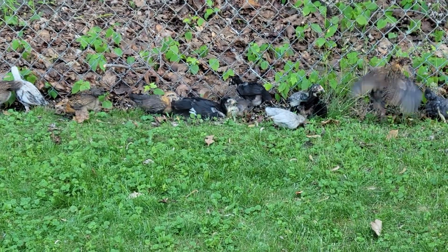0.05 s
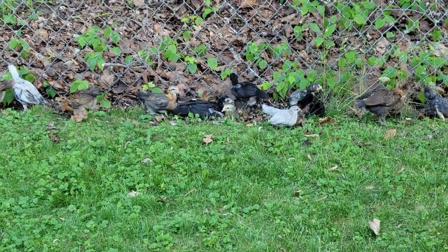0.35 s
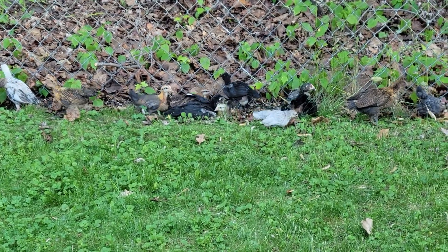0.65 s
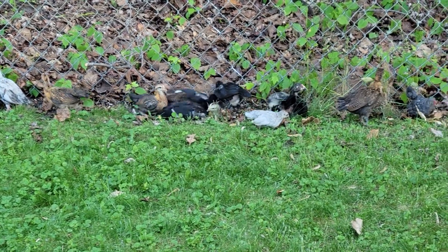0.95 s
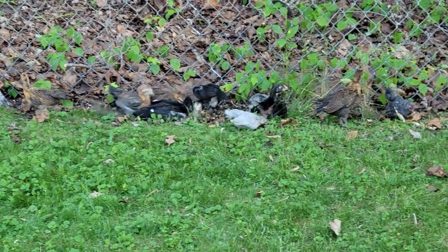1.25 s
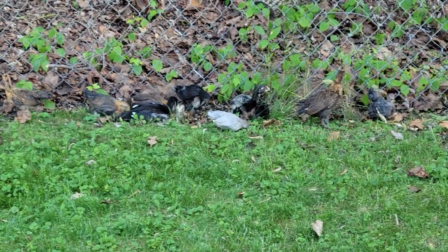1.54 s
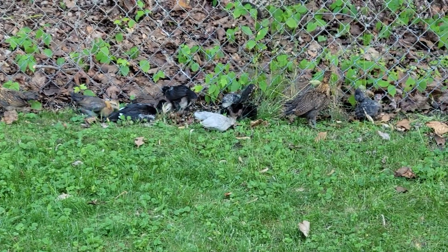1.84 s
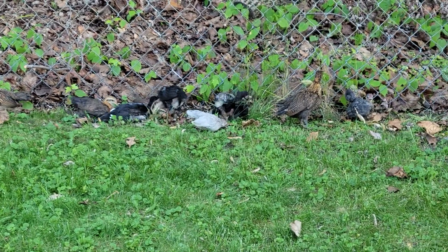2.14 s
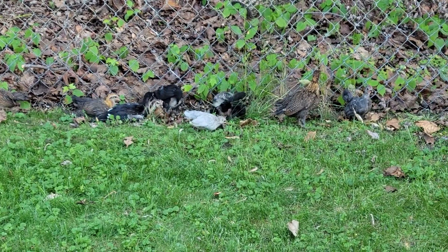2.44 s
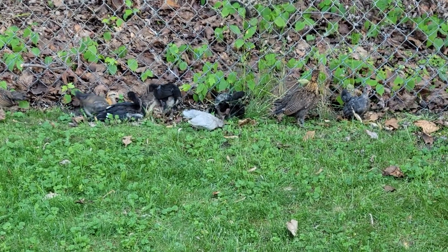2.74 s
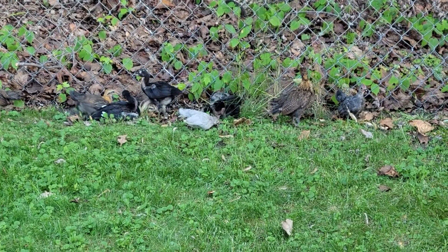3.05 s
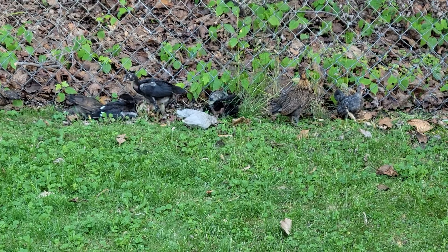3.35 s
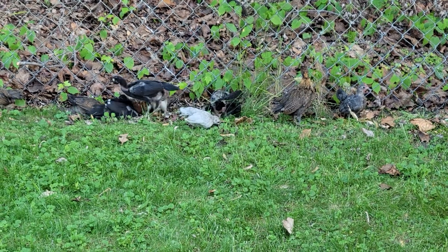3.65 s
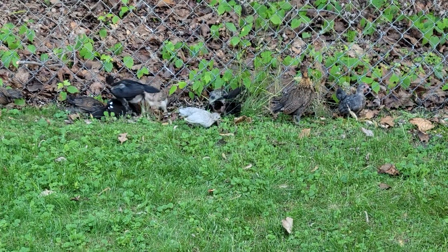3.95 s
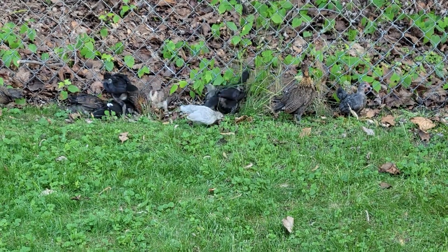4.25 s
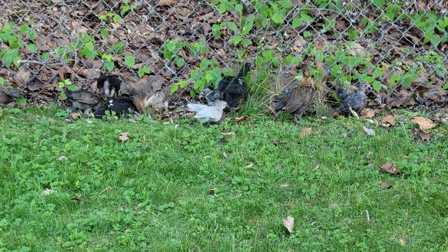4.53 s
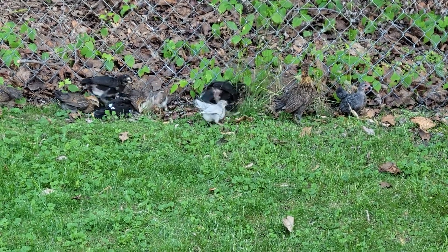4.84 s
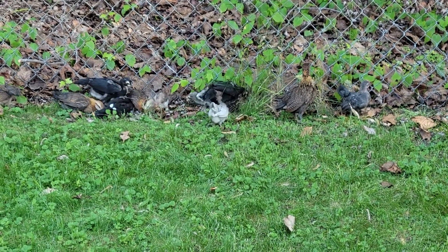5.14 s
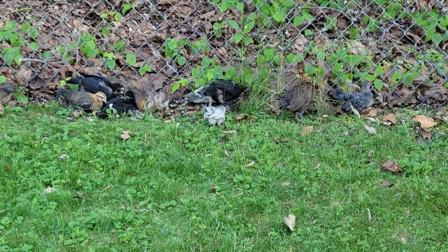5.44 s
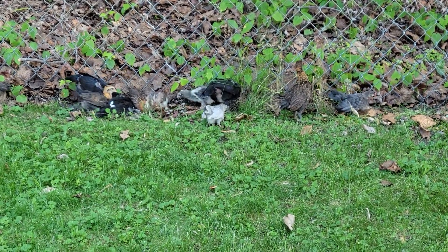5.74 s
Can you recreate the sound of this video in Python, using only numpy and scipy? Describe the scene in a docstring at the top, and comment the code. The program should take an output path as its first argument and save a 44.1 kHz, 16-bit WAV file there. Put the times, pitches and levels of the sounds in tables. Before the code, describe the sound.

In a garden, young chickens peep in quick, quiet notes, some hoarse, and scratch barely audibly in dry leaves. The low, wavering hum of a distant lawn mower is the strongest sound and runs the whole time with a light hiss. Some brief dull bumps land a little after two seconds. Far off, one bird sings a dry trill that stops past halfway, and another adds thin whistles. The birds sit to the microphone's right.

```python
"""Young chickens peep and scratch in dry leaves along a garden fence, each call a quick syrinx glide,
a few breaking into a rasp. Under them a lawn mower drones a few gardens away: low engine orders swell
and fade as it moves, with exhaust rumble, a ringing deck and the rush of the blades on top.
One songbird trills far off, another whistles, and a soft hiss fills the background.
A few dull scuffs land about two seconds in."""
import sys
import numpy as np
from scipy import signal
from scipy.fft import rfft, irfft, next_fast_len
from scipy.io import wavfile
from scipy.ndimage import uniform_filter1d, map_coordinates

SR = 44100
rng = np.random.default_rng(int(sys.argv[2]) if len(sys.argv) > 2 else 0)


def pcm_store(signal):
    """Save signal as 16-bit PCM."""
    levels = np.round(np.clip(np.atleast_2d(signal), -1, 1) * 32767)
    wavfile.write(sys.argv[1], SR, levels.astype(np.int16).T)


N = 264159

# A pan_db is left minus right; a fader_db is a level ahead of its layer's further gains.
# peeps that dip and flick up: start_s, length_s, low_hz, slide_share, flick_share, level_db
PEEPS = [(.305, 0.06, 1950, .4, .28, -51), (.432, 0.04, 2020, 0.134, 0.47, -46),
         (0.497, 0.037, 2417, 0.18, .32, -44.5), (.935, 0.046, 2410, 0.16, .15, -43),
         (1.0, .02, 2425, .04, 0.015, -47.5), (1.71, 0.063, 2020, 0.087, 0.58, -49.5),
         (1.886, 0.049, 2210, 0.21, 0.33, -43), (2.365, 0.06, 2300, .08, 0.16, -46.5),
         (2.53, 0.042, 2350, .04, .12, -51), (2.593, 0.032, 2530, 0.057, 0, -43.5),
         (3.041, 0.043, 2080, 0.34, 0.32, -43), (3.228, 0.043, 2547, .11, .0, -42.5),
         (4.235, 0.045, 2530, .03, 0.41, -54), (4.51, 0.027, 2350, .19, 0.25, -53),
         (4.838, 0.041, 2580, 0.17, 0.012, -54), (4.9, 0.032, 2130, .03, 0.37, -49.5),
         (5.072, .041, 2306, 0.047, 0.36, -44.5), (5.482, 0.033, 2140, 0.14, 0.22, -46)]
# cheeps that fall ever faster: start_s, length_s, top_hz, fall_share, level_db, pan_db
CHEEPS = [(0.294, .055, 3370, 0.16, -57, -9), (1.129, 0.061, 3135, 0.18, -50.5, -10),
          (1.636, 0.04, 3410, 0.38, -52, -15), (1.837, .047, 3750, 0.55, -52, -9),
          (1.978, 0.057, 3680, 0.45, -51, -9), (2.397, 0.032, 2950, 0.2, -49, -15),
          (2.515, 0.048, 3480, 0.28, -52.5, -9), (2.58, 0.072, 3830, .07, -53.5, -25),
          (2.909, 0.07, 3850, 0.22, -51, -20), (3.116, 0.03, 3650, 0.43, -52, -9),
          (3.21, .055, 3660, .23, -57, -21), (3.412, .056, 3650, .36, -56, -17.5),
          (3.769, 0.068, 3860, 0.45, -49, -16), (3.88, 0.073, 3800, 0.34, -48, -21),
          (4.003, 0.07, 4020, 0.39, -50, -20), (4.148, 0.053, 4020, 0.45, -50.5, -14),
          (4.409, 0.069, 3860, 0.21, -52, -15), (4.666, 0.06, 3500, 0.38, -53.5, -6),
          (4.783, 0.054, 3730, 0.29, -55, -13), (5.683, .051, 2750, 0.25, -53, -12)]
# pips in one small arch: start_s, length_s, top_hz, arch_share, level_db, pan_db
PIPS = [(0, 0.019, 2710, .04, -49, -7), (0.147, 0.023, 1790, .03, -46.5, -3),
        (.886, 0.0286, 2720, 0.23, -46.5, -9), (1.192, 0.028, 2480, 0.13, -40.5, -7),
        (1.221, 0.021, 1920, .04, -49, -12), (4.559, 0.056, 3760, .1, -52, -18),
        (4.877, .03, 1550, 0.026, -48, -11), (4.957, 0.039, 3680, 0.082, -53.5, -15),
        (5.09, 0.028, 3830, .15, -54, -17), (5.402, .028, 3280, 0.043, -45, -14),
        (5.429, 0.033, 4050, .22, -51, -24)]
# the syrinx breaking into a rasp: start_s, length_s, level_db
RASPS = [(0.288, 0.12, -56), (0.43, 0.081, -53), (0.505, 0.027, -45), (0.894, 0.13, -45.5),
         (1.887, 0.13, -49), (2.272, 0.026, -46), (2.388, .05, -49), (5.436, .03, -63)]
# throat resonances of the rasp: frequency_hz, gain_db
THROAT_EQ = [(1200, -28), (1750, 8), (2100, 2), (2550, 7), (3300, 5.5), (4000, -25), (5000, -12),
             (6000, -45), (8000, -60)]
# decay of the garden's echo: frequency_hz, t60_s
GARDEN_DECAY = [(200, 0.23), (3000, 0.33), (10000, 0.27)]

# engine speed, four firings to a cycle: time_s, cycle_hz
ENGINE_SPEED = [(0, 19.65), (.5, 19.51), (1.2, 19.28), (2, 19.12), (3, 18.92), (3.75, 18.74), (4.5, 18.92),
                (5.2, 18.72), (5.99, 18.55)]
# the four strongest harmonics, each fading on its own way over the gardens: time_s, fader_db
HARMONIC_RIDES = [[(0.01, -31.2), (0.27, -35), (0.73, -33.6), (0.85, -39.5), (1.07, -41), (1.19, -33.5),
                   (2.03, -33), (2.23, -29.5), (2.71, -30.5), (3.37, -37.5), (3.73, -26.0), (4.09, -30),
                   (4.87, -29), (5.07, -31.5), (5.29, -45), (5.39, -34.5), (5.59, -33), (5.97, -39.5)], [(0.01, -52), (0.69, -46.7), (0.91, -54), (1.25, -48.1), (1.59, -52),
                                        (2.99, -49.5), (3.31, -57), (4.13, -51.3), (5.15, -64),
                                        (5.97, -42.5)],
                  [(0.01, -41), (0.45, -35), (0.81, -42.1), (0.91, -37.5), (1.65, -40), (1.93, -34),
                   (2.75, -41.5), (3.35, -38.5), (3.43, -36), (4.69, -41.5), (4.83, -49), (5.03, -42.5),
                   (5.71, -37), (5.97, -38)], [(0.01, -56.0), (0.71, -55.5), (1.81, -41), (2.91, -42),
                                           (2.99, -50.5), (3.29, -42.5), (4.11, -41), (4.33, -49.4),
                                           (4.47, -42), (5.09, -45), (5.97, -38.5)]]
# balance of those harmonics, first to fourth: trim_db
HARMONIC_TRIMS = [-0.48, -0.71, 0.13, 0.074]
# a tone just under the firing rate that makes the drone throb: time_s, level_db
THROB_RIDE = [(2.9, -56), (3.6, -50), (4.3, -42), (5.4, -43), (5.99, -65)]
# weak orders from unequal firings: cycle_multiple, fader_db
WEAK_ORDERS = [(11, -56), (13, -51.5), (14, -63), (15, -61.5), (17, -54), (18, -62.5), (20, -66), (24, -68),
               (25, -65), (42, -62), (46, -74), (50, -69)]
# hum of a second, fainter machine: pitch_hz, fader_db
FAR_HUM = [(48.5, -54), (101.5, -52.5)]
# exhaust rumble: frequency_hz, gain_db
EXHAUST_EQ = [(15, -20), (32, -6), (48, -0.5), (95, 5), (125, -6), (180, -6), (245, -3), (335, -4.5),
              (420, -11.5), (515, -14.5), (600, -14.5), (900, -50)]
# the cutting deck's hollow ring: frequency_hz, gain_db
DECK_EQ = [(400, -7), (480, -7.5), (520, 7.5), (550, -5), (600, -6), (700, -53)]
# swells of that ring: time_s, fader_db
DECK_RIDE = [(0.01, -52.5), (0.25, -45.5), (1.17, -61.5), (2.05, -46.5), (2.19, -52.5), (4.09, -54.5),
             (5.15, -57.5), (5.97, -56)]
# air rushing off the blades: frequency_hz, gain_db
BLADE_EQ = [(400, -25), (650, -10.5), (790, -1.5), (1000, -1.5), (1170, 1.5), (1270, -10), (1450, -11.5),
            (2000, -14.5), (3500, -72)]
# swells of that rush: time_s, fader_db
BLADE_RIDE = [(0.01, -48), (0.53, -53.5), (1.05, -49), (1.63, -51.8), (2.15, -47.5), (3.05, -50.5),
              (5.97, -50.5)]
# soft background hiss, cut off steeply above about 7 kHz: frequency_hz, gain_db
HISS_EQ = [(700, -5.5), (1400, -1), (1900, -2.5), (3000, 1), (4200, -5), (5500, -12), (7100, -16),
           (7600, -28.5), (9500, -26), (12500, -27.5), (15500, -30.5)]
# its lean to the right: frequency_hz, pan_db
HISS_PAN = [(60, -0.5), (110, -0.5), (200, -0.5), (380, -2), (700, -1.5), (1290, -4.5), (2380, -3),
            (4400, -10), (8120, -9), (15000, -9.5)]

# pace of the trill: time_s, chips_per_s
TRILL_PACE = [(0, 20.4), (1.4, 19.6)]
# swells of the trill: time_s, fader_db
TRILL_RIDE = [(.03, -58), (.8, -59), (1.3, -54), (2.3, -58.5), (2.8, -56.5), (3.2, -56), (3.7, -63)]
# feet and beaks in the leaves: start_s, length_s, fader_db
SCRATCHES = [(.13, .08, -75), (2.7, .05, -71), (3.55, 0.092, -76), (3.7, .13, -74), (3.797, .015, -66),
             (4.066, .012, -65), (4.55, 0.28, -78), (4.855, 0.019, -67), (4.787, .26, -68),
             (5.018, 0.15, -74), (5.18, .05, -72), (5.8, 0.13, -76)]
# crisp top of dry leaves: frequency_hz, gain_db
LEAF_EQ = [(800, -22), (2500, -11), (10000, 4), (15500, -7)]
# far whistled notes: start_s, length_s, pitch_hz, fader_db
WHISTLES = [(1.16, 0.11, 3075, -47.5), (1.27, 0.1, 3140, -47.5), (2.409, 0.075, 2963, -47),
            (2.638, 0.11, 2765, -41.5), (2.73, 0.095, 2790, -49.5), (3.464, 0.077, 3020, -51),
            (4.068, 0.096, 3054, -48.5), (4.15, .06, 3160, -44), (5.215, 0.056, 3200, -47.5)]
# dull knocks and scuffs: start_s, length_s, level_db
SCUFFS = [(2.209, 0.026, -34.5), (2.257, 0.04, -56), (2.324, 0.07, -42), (2.595, 0.12, -42.5)]
# their boxy midrange: frequency_hz, gain_db
SCUFF_EQ = [(400, -33), (700, -14), (950, 14), (1400, -21), (2700, -13), (4500, -35), (8000, -81)]


def amp(db):
    """Decibels to gain."""
    return 10 ** (np.asarray(db) / 20)


def unit(x):
    """Scaled to rms 1."""
    return x / np.sqrt(np.mean(x ** 2) + 1e-20)


def along(points, hz):
    """A curve over frequency, read on a log axis."""
    knots_hz, values = np.transpose(points)
    return np.interp(np.log(hz + 1), np.log(knots_hz + 1), values)


def ride(points):
    """An automation curve, one value per sample."""
    return np.interp(np.arange(N) / SR, *np.transpose(points))


def wobble(rate):
    """A smooth random curve, rate knots a second."""
    return map_coordinates(rng.standard_normal(int(N * rate / SR) + 4), [np.arange(N) * rate / SR])


def filtered(x, response):
    """x through a complex frequency response."""
    size = next_fast_len(N + SR // 2)
    return irfft(rfft(x, size) * response(np.fft.rfftfreq(size, 1 / SR)), size)[..., :N]


def pan(pan_db):
    """Left and right gains of mean power 1."""
    return unit(amp([[pan_db / 2], [-pan_db / 2]]))


def add(track, start_s, sound):
    """Mix a sound in at start_s."""
    part = track[..., round(start_s * SR):][..., :sound.shape[-1]]
    part += sound[..., :part.shape[-1]]


def bursts(events, taper=1):
    """An envelope with one soft bump per event; taper is the share spent fading."""
    envelope = np.zeros(N)
    for start_s, length_s, db in events:
        add(envelope, start_s, amp(db) * signal.windows.tukey(int(length_s * SR), taper))
    return envelope


def tone(phase, random_start=True):
    """A sine of rms 1."""
    return np.sqrt(2) * np.sin(phase + (rng.uniform(0, 2 * np.pi) if random_start else 0))


def rush(eq, shared, patchy_db):
    """Stereo noise of rms 1, partly common to both sides, with patches of random gain."""
    spectra = signal.stft(rng.standard_normal((3, N)), nperseg=512)[2]
    patches = uniform_filter1d(rng.standard_normal(spectra.shape[1:]), size=5, axis=0)
    patches = unit(uniform_filter1d(patches, size=14, axis=1))
    noise = signal.istft(spectra * amp(patchy_db * patches), nperseg=512)[1][:, :N]
    pair = np.sqrt(shared) * noise[2] + np.sqrt(1 - shared) * noise[:2]
    return unit(filtered(pair, lambda hz: amp(along(eq, hz))))


def syrinx(length_s, glide, rise_db, waver, overtone_db=-35):
    """A bird note of rms 1: its pitch is glide(u), u from 0 to 1, and its level tilts by rise_db."""
    u = np.linspace(0, 1, int(length_s * SR))
    tremor, flutter = (map_coordinates(knots, [u * length_s * 400], mode="mirror")
                       for knots in rng.standard_normal((2, 128)))
    hz = glide(u)
    phase = 2 * np.pi * np.cumsum(hz * (1 + waver * tremor)) / SR
    gate = np.sin(np.pi / 2 * np.minimum(1, np.minimum(u / .2, (1 - u) / .1)))
    swell = gate * amp(rise_db * u + 1.2 * np.sin(np.pi * u) + 1.5 * flutter)
    overtone = amp(overtone_db) / (1 + (hz / 2900) ** 10)  # the throat passes it only on low notes
    return unit(swell * (np.sin(phase) + overtone * np.sin(2 * phase)))


def arching(hz, arch):
    """Pitch that tops out at hz in the middle."""
    return lambda u: hz * (1 - arch * (2 * u - 1) ** 2)


def falling(hz, fall, apex, bend):
    """Pitch that tops out at hz when u is apex, then drops, ever faster if bend is over 1."""
    return lambda u: hz * (1 - fall * (np.abs(u - apex) / (1 - apex)) ** bend)


def dipping(hz, slide, flick, turn=.659):
    """Pitch that slides down to hz until u is turn, then flicks up."""
    return lambda u: hz * (1 + slide * np.maximum(1 - u / turn, 0) ** 1.092
                           + flick * np.maximum((u - turn) / (1 - turn), 0) ** 1.86)


def scattered(x, spread_s):
    """Leaves and ground smear a sound over a few ms, differently on each side."""
    t = np.arange(SR // 25) / SR
    paths = rng.standard_normal((2, len(t))) * np.exp(-t / spread_s)
    return signal.fftconvolve(x[None], paths / np.linalg.norm(paths[0]), axes=1)[:, :N]


def garden(x):
    """Diffuse echo from fence, trees and house walls."""
    hz, t, spectra = signal.stft(rng.standard_normal((2, SR // 2)), SR, nperseg=256)
    decay = amp(-60 * t / along(GARDEN_DECAY, hz)[:, None])
    onset = 1 - np.exp(-t / .0049)
    tail = signal.istft(spectra * decay * onset, SR, nperseg=256)[1]
    return signal.fftconvolve(np.atleast_2d(x), tail / np.linalg.norm(tail[0]), axes=1)[:, :N]


def chick_calls(peep_pan_db=-10, faint_per_s=3):
    """The flock's cue list: start_s, length_s, glide, level_db, pan_db."""
    calls = []
    for start_s, length_s, hz, slide, flick, db in PEEPS:
        calls.append((start_s, length_s, dipping(hz, slide, flick), db, peep_pan_db))
    for start_s, length_s, hz, fall, db, pan_db in CHEEPS:
        calls.append((start_s, length_s, falling(hz, fall, apex=.168, bend=1.9), db, pan_db))
    for start_s, length_s, hz, arch, db, pan_db in PIPS:
        calls.append((start_s, length_s, arching(hz, arch), db, pan_db))
    # faint peeps from the rest of the flock
    for when, pitch, slide, flick in rng.random((int(faint_per_s * N / SR), 4)):
        glide = dipping(2560 * (1 + .3 * (pitch - .5)), .193 * slide, .5 * flick)
        calls.append((when * N / SR, .045, glide, -58.5, peep_pan_db))
    return calls


def chicks():
    """Calls along the fence; a strained syrinx rasps and sounds more of its octave."""
    hoarseness = bursts(RASPS, taper=.8)
    flock = hoarseness * rush(THROAT_EQ, shared=.8, patchy_db=2) * pan(-10)
    for start_s, length_s, glide, db, pan_db in chick_calls():
        middle = min(int((start_s + length_s / 2) * SR), N - 1)
        strain = min(hoarseness[middle] / amp(db), .5)
        overtone_db = 20 * np.log10(.036 + .25 * strain)
        call = syrinx(length_s, glide, rise_db=5, waver=.018, overtone_db=overtone_db)
        add(flock, start_s, amp(db) * call * pan(pan_db))
    send = flock.mean(0)
    echo = amp(-6.5) * scattered(send, spread_s=.0066) + amp(-11.5) * garden(send)
    return flock + echo * pan(.5)


def mower_engine(cycle, throb_hz=5.05, throb_crest_s=4.66):
    """Engine orders flutter in the moving air while a nearby tone beats against the lowest."""
    firing = 4 * cycle
    beat = 2 * np.pi * throb_hz * (np.arange(N) / SR - throb_crest_s)
    drone = amp(ride(THROB_RIDE)) * tone(firing - beat, random_start=False)
    rides_db = [ride(points) for points in HARMONIC_RIDES]
    for k, (db, trim_db) in enumerate(zip(rides_db, HARMONIC_TRIMS), 1):
        drone += amp(db + trim_db + .5 * wobble(9)) * tone(k * firing, random_start=k > 1)
    for order, db in WEAK_ORDERS:
        # the lower ones fade with the nearest strong harmonic
        nearest_db = rides_db[min(round(order / 4), 4) - 1]
        fade_db = .89 * (nearest_db - nearest_db.mean()) if order < 22 else 0
        drone += amp(db + fade_db + 1.5 * wobble(2.54)) * tone(order * cycle)
    return drone * pan(-.4)


def far_machine():
    """A second machine hums underneath, drifting in level and pitch."""
    hum = np.zeros(N)
    for hz, db in FAR_HUM:
        gain = amp(db + 1 + 2.7 * wobble(3.5))
        drifting_hz = hz * (1 + .0202 * wobble(3))
        hum += gain * tone(2 * np.pi * np.cumsum(drifting_hz) / SR)
    return hum * pan(-.4)


def mower_exhaust():
    """Rough low rumble that loosely follows the fading of the third harmonic."""
    third_db = ride(HARMONIC_RIDES[2])
    level_db = -42.5 + .32 * (third_db - third_db.mean())
    return amp(level_db) * rush(EXHAUST_EQ, shared=.92, patchy_db=0) * pan(-.41)


def mower_deck(cycle):
    """Two close machine tones near 500 and 530 Hz whine and swell together over the deck's hollow ring."""
    whine = unit(sum(amp(3 * wobble(2)) * np.sin(order * cycle) for order in (26.53, 28)))
    ring = unit(.96 * whine + rush(DECK_EQ, shared=.86, patchy_db=1))
    return amp(ride(DECK_RIDE) + 2) * ring * pan(-.1)


def mower_blades(cycle):
    """Air rushes off the blades, pulsing lightly at the firing rate."""
    pulse = 1 + .087 * np.sin(4 * cycle)
    return amp(ride(BLADE_RIDE) + 5) * pulse * rush(BLADE_EQ, shared=.38, patchy_db=1.5) * pan(-1.6)


def background_hiss(fade_db_per_s=.41):
    """A wide, soft hiss, mostly from the right, slowly easing off."""
    level_db = -48.5 - fade_db_per_s * np.arange(N) / SR
    hiss = amp(level_db) * rush(HISS_EQ, shared=.12, patchy_db=1.56)
    lean = lambda hz: np.sqrt(2 / (1 + amp(np.outer([-2, 2], along(HISS_PAN, hz)))))
    return filtered(hiss, lean)


def triller(start_s=.031, end_s=3.7):
    """A sparrow's dry trill: one quick downward chip, repeated evenly after a slightly hurried start."""
    song, fader_db = np.zeros(N), ride(TRILL_RIDE)
    first, last = int(start_s * SR), int(end_s * SR)
    chip_count = np.floor(np.cumsum(ride(TRILL_PACE)[first:last]) / SR)
    for onset in first + np.flatnonzero(np.diff(chip_count, prepend=-1)):
        glide = falling(4980 * rng.normal(1, .01), fall=.2, apex=0, bend=1)
        chip = syrinx(.018, glide, rise_db=3, waver=.02)
        add(song, onset / SR, amp(fader_db[onset] + rng.normal(0, 1)) * chip)
    blurred = amp(-3.5) * song + amp(-6) * scattered(song, spread_s=.009)
    return (blurred + amp(-12) * garden(song)) * pan(-14)


def scratching(cracks_per_s=1900):
    """Each scratch lifts a cluster of tiny crackles out of a faint bed of dry leaves."""
    effort = amp(-76.5) + amp(1.5) * bursts(SCRATCHES)
    cracks = (rng.random((2, N)) < cracks_per_s / SR) * rng.standard_normal((2, N))
    crackle = filtered(cracks, lambda hz: amp(along(LEAF_EQ, hz)))
    return effort * unit(crackle + amp(-6) * garden(crackle)) * pan(-6)


def whistler():
    """Thin, nearly flat notes, blurred by distance."""
    song = np.zeros(N)
    for start_s, length_s, hz, db in WHISTLES:
        add(song, start_s, amp(db) * syrinx(length_s, arching(hz, .019), rise_db=-4, waver=.022))
    return (amp(-8.5) * song + amp(-9.5) * garden(song)) * pan(-4.5)


def scuffs():
    """Brief dull bumps without a ring."""
    return bursts(SCUFFS) * rush(SCUFF_EQ, shared=.43, patchy_db=-2)


def scene():
    """A bed of machines and hiss with the birds on top; one sagging engine speed drives the mower."""
    cycle = 2 * np.pi * np.cumsum(ride(ENGINE_SPEED)) / SR  # engine phase
    bed = mower_engine(cycle) + far_machine()
    bed += mower_exhaust() + mower_deck(cycle) + mower_blades(cycle) + background_hiss()
    return bed + whistler() + triller() + scratching() + scuffs() + chicks()


def record(dry, left_lag_s=.0004, top_hz=15720):
    """Sound reaches the left side a touch later, and everything above top_hz is cut."""
    lags_s = np.array([[left_lag_s / 2], [-left_lag_s / 2]])
    return filtered(dry, lambda hz: np.exp(-2j * np.pi * hz * lags_s) * (hz < top_hz))


dry = scene()
out = record(dry)
pcm_store(out)
```